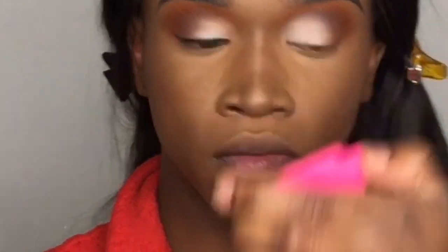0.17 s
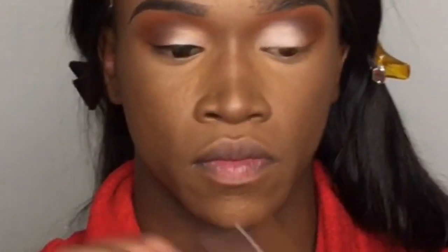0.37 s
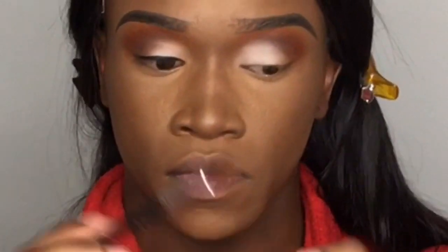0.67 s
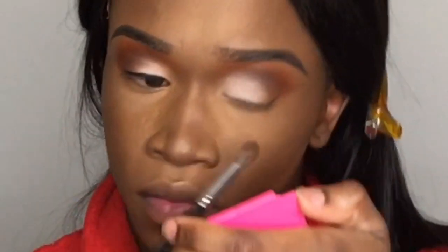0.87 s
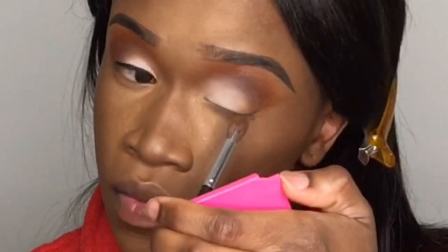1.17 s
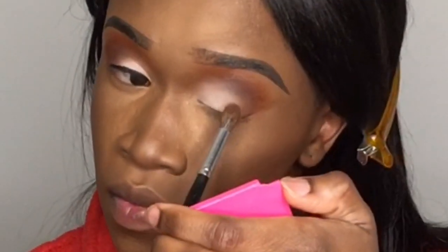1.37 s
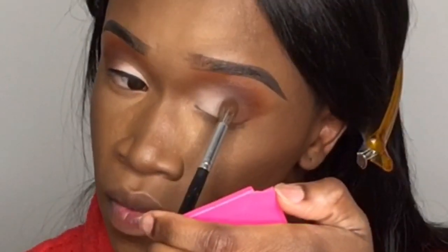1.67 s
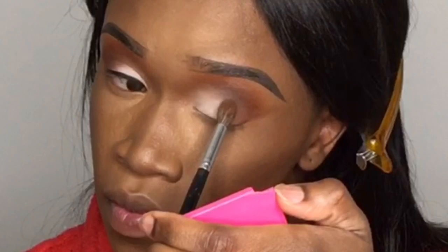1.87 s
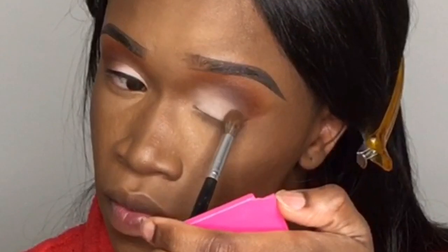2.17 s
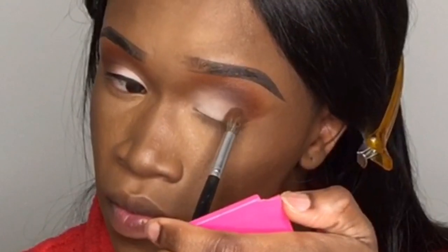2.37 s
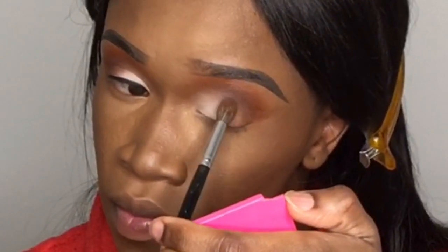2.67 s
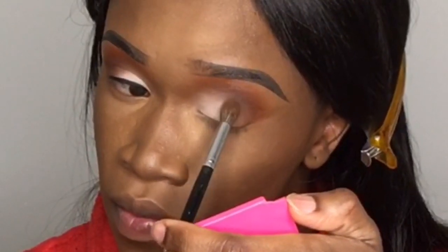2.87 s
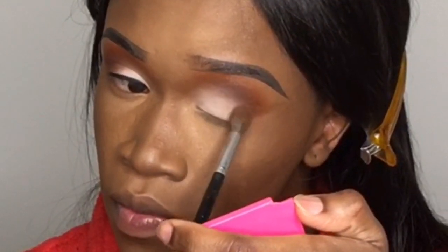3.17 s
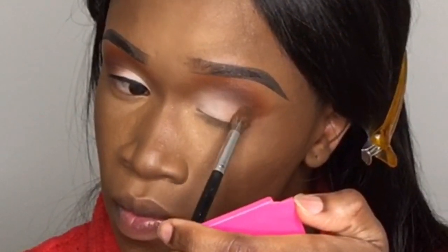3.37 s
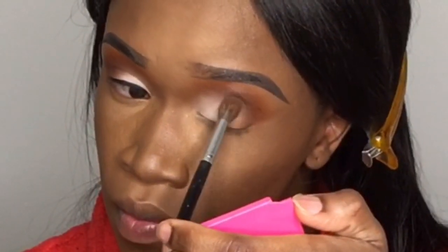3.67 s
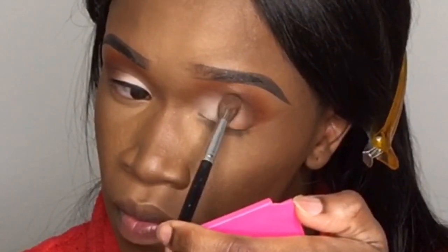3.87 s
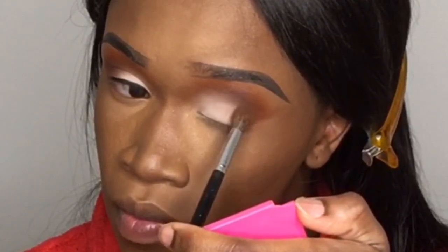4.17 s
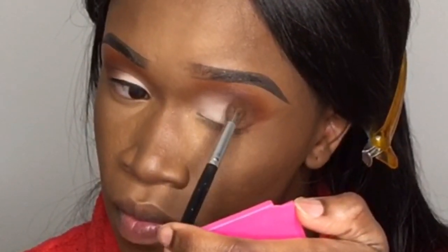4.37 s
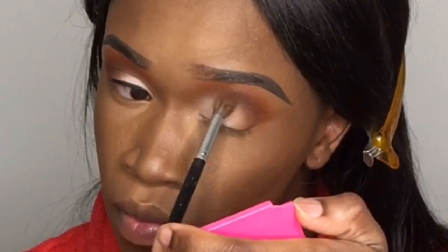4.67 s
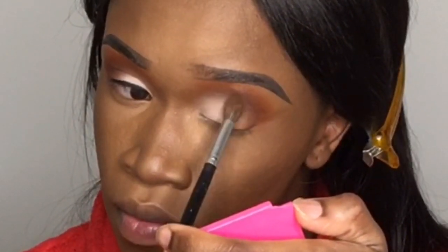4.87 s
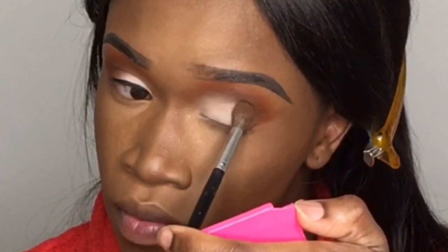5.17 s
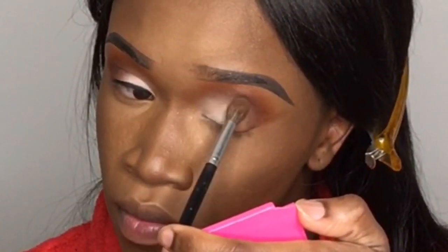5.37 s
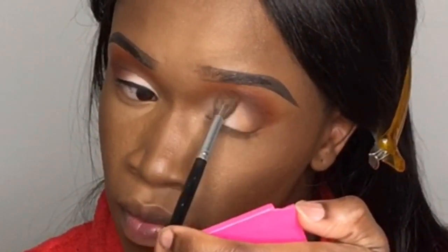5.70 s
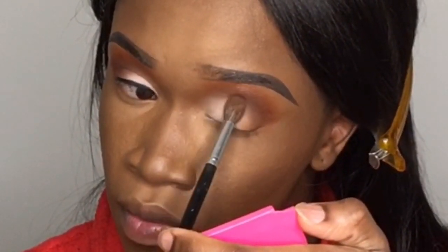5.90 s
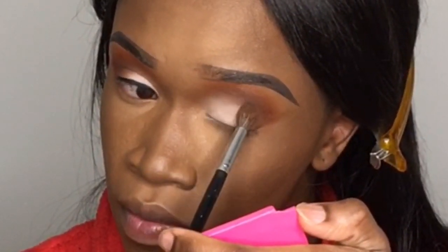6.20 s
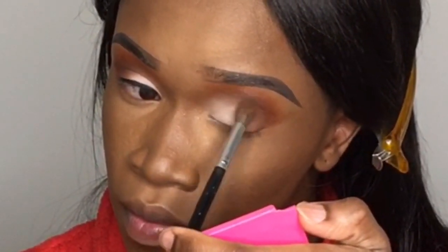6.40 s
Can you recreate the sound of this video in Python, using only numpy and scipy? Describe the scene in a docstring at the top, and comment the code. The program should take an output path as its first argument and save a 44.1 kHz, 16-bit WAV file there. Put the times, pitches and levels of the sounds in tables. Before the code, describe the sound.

Two quick, sharp snaps of a plastic makeup case sound right by the microphone, far louder than anything else, and ring briefly in a small room. Six faint, muffled thuds follow, about a second apart, each with a slight rustle. Throughout lies a quiet bed of ventilation rumble, fan hum, faint wavering drones and electronic hiss with very fine, fast ticking.

```python
"""A small, quiet room: from the start the ventilation rumbles and a fan hums under faint drones, while
the electronics add hiss and twenty tiny ticks a second. Near half a second, hard plastic snaps twice
close to the microphone, overloads it briefly and sets the room ringing. The low drone swells with the
snaps and again near two seconds; the high one sinks and fades. From one and a half seconds on, a soft,
dull thud returns about once a second."""
import sys
import numpy as np
from scipy import signal
from scipy.fft import rfft, irfft, next_fast_len
from scipy.io import wavfile

SR = 44100
rng = np.random.default_rng(int(sys.argv[2]) if len(sys.argv) > 2 else 0)


def unload_audio(sound):
    """Save the sound as a 16-bit wav file, at the path given as the first command line argument."""
    columns = np.transpose(np.atleast_2d(sound))
    # keep every value between -1 and 1, then stretch to whole-number steps
    steps = np.round(np.clip(columns, -1, 1) * 32767)
    wavfile.write(sys.argv[1], SR, steps.astype(np.int16))


N = 288414
TIME = np.arange(N) / SR


def from_db(db):
    """Amplitude grows tenfold for every 20 dB."""
    return 10 ** (np.asarray(db) / 20)


def at_hz(points, hz):
    """Interpolation on a logarithmic frequency axis gives each octave equal width."""
    frequencies, values = np.transpose(points)
    return np.interp(np.log(np.maximum(hz, 1)), np.log(frequencies), values)


def noise(spectrum):
    """Spectral shaping turns white noise into coloured noise, here scaled to rms 1."""
    size = next_fast_len(N)
    gain = from_db(at_hz(spectrum, np.fft.rfftfreq(size, 1 / SR)))
    coloured = irfft(rfft(rng.standard_normal(N), size) * gain, size)[:N]
    return coloured / np.sqrt(np.mean(coloured ** 2) + 1e-20)


def drift(rate_hz):
    """Interpolation between Gaussian values gives a slow fluctuation with a spread near 1."""
    return np.interp(TIME * rate_hz, np.arange(400), rng.standard_normal(400))


def decay(start_s, t60_s, rise_s):
    """Exponential damping: after its rise, the envelope loses 60 dB every t60_s."""
    age = np.maximum(TIME - start_s, 0)
    return (1 - np.exp(-age / rise_s)) * from_db(np.maximum(-60 * age / t60_s, -300))


def struck(start_s, modes, rise_s, spread_db):
    """Modal superposition: an impulse excites damped sinusoids, each of slightly random strength."""
    out = np.zeros(N)
    for k, (hz, db, t60_s) in enumerate(modes):
        strength = (-1) ** k * from_db(db + spread_db * rng.standard_normal())
        out += strength * decay(start_s, t60_s, rise_s) * np.sin(2 * np.pi * hz * (TIME - start_s))
    return out


def tone(hz, db, waver_hz, waver_db):
    """Random frequency and amplitude modulation make a sinusoid waver."""
    phase = 2 * np.pi * np.cumsum(hz + waver_hz * drift(14)) / SR
    return np.sqrt(2) * from_db(db + waver_db * drift(12)) * np.sin(phase)


def ventilation(rest_db=-47, extra_db=6, settle_s=1.96):
    """Random pressure fluctuations: the room's air booms, and a rumble settles to a steady level."""
    # Spectrum of the air's deep boom. Each row: frequency in Hz, relative density in dB.
    boom_spectrum = [(22, -34), (40, -12), (51, -11.5), (62, 1.5), (72, -5), (82, -1.5), (96, -10),
                     (140, -24), (400, -61)]
    # Course of the boom. Each row: time in seconds, level in dB.
    boom_levels = [(0, -46.5), (0.8, -44), (3.6, -43.5), (3.9, -48), (6.54, -45)]
    # Spectrum of the rumble. Each row: frequency in Hz, relative density in dB.
    rumble_spectrum = [(50, -24), (95, -9), (130, -3.5), (200, -11), (270, -15.5), (325, -13.5),
                       (480, -23.5), (750, -28.5), (2000, -47)]
    boom_db = np.interp(TIME, *np.transpose(boom_levels))
    rumble_db = rest_db + extra_db * np.exp(-TIME / settle_s)
    return from_db(boom_db) * noise(boom_spectrum) + from_db(rumble_db) * noise(rumble_spectrum)


def fan_hum(hz=61.8, rms_db=-56.5):
    """The periodic motion of a fan radiates a steady tone."""
    return np.sqrt(2) * from_db(rms_db) * np.sin(2 * np.pi * hz * TIME)


def low_drone(hz=146, rest_db=-56):
    """Slow amplitude modulation: a faint tone swells twice about a fixed mean pitch."""
    # Gaussian swells. Each row: crest time in seconds, level in dB, 1/e half-width in seconds.
    crests = [(0.4, -45.5, 0.43), (1.94, -41, 0.56)]
    swells = sum(from_db(db) * np.exp(-((TIME - s) / width) ** 2) for s, db, width in crests)
    return (from_db(rest_db) + swells) * tone(hz, db=0, waver_hz=1.2, waver_db=1.4)


def high_drone(first_hz=202.5, sunk_hz=189, hold_s=0.48, sink_s=0.36):
    """Exponential relaxation: a tone holds, sinks and fades; a hum lingers near its first pitch."""
    fade_db_per_s, hum_fade_db_per_s = 8.5, 3
    age = np.maximum(TIME - hold_s, 0)
    hz = sunk_hz + (first_hz - sunk_hz) * np.exp(-age / sink_s)
    sinking = tone(hz, db=-43 - fade_db_per_s * age, waver_hz=4.34, waver_db=3.5)
    hum = tone(hz=204.7, db=-47 - hum_fade_db_per_s * TIME, waver_hz=3.53, waver_db=2.5)
    return sinking + hum


def hiss(rms_db=-51):
    """Electronic noise spreads over a broad band, weaker towards the treble."""
    # Spectrum of the hiss. Each row: frequency in Hz, relative density in dB.
    spectrum = [(100, 1), (800, 0), (1500, -2.5), (2800, -5.5), (4000, -6.5), (4900, -10.5), (5600, -8),
                (6800, -10), (7800, -11), (9600, -9.5), (10400, -17.5), (11100, -12), (15500, -16.5)]
    return from_db(rms_db) * noise(spectrum)


def interference_ticks(first_s=0.0229, period_s=0.05, gain_db=-35, stray_share=0.18, uneven_db=0.5):
    """Convolution: regular pulses of interference, and a few strays, share one impulse response."""
    # Resonances of a tick. Each row: frequency in Hz, relative level in dB, 60 dB decay in seconds.
    modes = [(5940, -7, 0.0037), (6720, 2, 0.0029), (9690, -5, 0.0064), (12300, -6.5, .002),
             (14700, -6, .002)]
    beats = np.arange(first_s, TIME[-1], period_s)
    lag_draw, stray_draw, jitter_draw = rng.random((len(beats), 3)).T
    stray_lag_s = np.where(lag_draw < .5, .0035, .017)
    strays = (beats + stray_lag_s)[stray_draw < stray_share]
    onsets = (np.concatenate([beats + .0008 * jitter_draw, strays]) * SR).astype(int)
    pulses = np.zeros(N)
    pulses[onsets[onsets < N]] = 1
    pulses *= from_db(uneven_db * rng.standard_normal(N))
    response = struck(0, modes, rise_s=0.00052, spread_db=0.5)
    return from_db(gain_db) * signal.fftconvolve(pulses, response)[:N]


def crack(start_s, t60_s, low_hz, high_hz):
    """A brief transient has a broad spectrum: a few milliseconds of bright noise."""
    band = signal.butter(1, [low_hz, high_hz], "band", fs=SR, output="sos")
    return signal.sosfilt(band, rng.standard_normal(N)) * decay(start_s, t60_s, rise_s=.0001)


def plastic_snaps():
    """Impulsive excitation: the plastic cracks and rings; a near wall and the whole room reflect it."""
    # The snaps. Each row: start in seconds, gains in dB of the direct sound, the reverberation and
    # the lingering tones, delay of the wall's echo in seconds, its gain in dB.
    snaps = [(0.4275, 0, -10, -11.5, 0.0084, -1), (0.5644, 2, -12, -15, 0.0069, -7.5)]
    # The plastic's clack. Each row: frequency in Hz, relative level in dB, 60 dB decay in seconds.
    plastic_modes = [(423, -30, 0.061), (1132, -12, 0.022), (1725, -6, 0.013), (2954, -0.5, 0.013),
                     (3590, -5, 0.015), (4350, -3.5, 0.015), (6530, -10.5, 0.016), (8980, -4, 0.0065),
                     (13240, -11, 0.0081)]
    # Lingering tones. Each row: frequency in Hz, relative level in dB, 60 dB decay in seconds.
    ring_modes = [(1144, -17.5, 0.38), (1580, -14, 0.22), (1870, 1.5, 0.11), (2020, -2, 0.17),
                  (2129, 1.5, 0.19), (2282, -7.5, 0.35), (2570, -15.5, 0.32), (2850, 2.5, 0.1),
                  (3137, -6, 0.21), (3569, -13.5, 0.24), (3660, -2, 0.15), (4160, -17.5, 0.24),
                  (4070, -13, .35), (4400, -9, 0.27), (4940, -9, 0.18), (5530, -13, 0.22), (6170, -22, 0.3)]
    out = np.zeros(N)
    for start_s, direct_db, room_db, ring_db, delay_s, echo_db in snaps:
        clack = struck(start_s, plastic_modes, rise_s=.0001, spread_db=4.0)
        burst = from_db(-8.0) * crack(start_s, t60_s=0.006, low_hz=1500, high_hz=12000)
        out += from_db(direct_db) * (clack + burst)
        out += from_db(echo_db) * crack(start_s + delay_s, t60_s=0.013, low_hz=1187, high_hz=10940)
        out += from_db(room_db) * reverberation(start_s, rise_s=0.0027)
        # the lingering tones build up along with the reflections
        out += from_db(ring_db) * struck(start_s, ring_modes, rise_s=0.0096, spread_db=2.0)
    return out


def reverberation(start_s, rise_s):
    """A diffuse field: dense reflections build up and die away, faster in the treble."""
    # Spectrum of the reflections. Each row: frequency in Hz, relative density in dB.
    spectrum = [(150, -32), (300, -24), (550, -26.5), (690, -14.5), (810, -24.5), (1120, -13),
                (1600, -14.5), (2150, -3), (2600, -8.5), (3800, -12.5), (6600, -13), (7600, -17),
                (10000, -18), (15500, -26)]
    # The room's decay. Each row: band centre in Hz, reverberation time in seconds.
    band_decays = [(300, 0.32), (1100, 0.29), (2300, 0.32), (6000, 0.31), (10000, 0.23), (15000, 0.17)]
    centres, t60s = np.transpose(band_decays)
    size = next_fast_len(N)
    field, hz = rfft(noise(spectrum), size), np.fft.rfftfreq(size, 1 / SR)
    out = np.zeros(N)
    for one_band, t60_s in zip(np.eye(len(centres)), t60s):
        share = at_hz(np.column_stack([centres, one_band]), hz)
        out += irfft(field * share, size)[:N] * decay(start_s, t60_s, rise_s)
    return out


def dull_thuds(half_width_s=0.033, rustle_db=-41.5):
    """Low noise under a smooth envelope is heard as a soft thud; a faint rustle outlasts each one."""
    # The thuds. Each row: crest time in seconds, level in dB.
    crests = [(1.491, -37), (2.41, -41), (3.43, -39), (4.41, -37.5), (5.435, -35), (6.46, -41.5)]
    # Spectra of a thud's body and its rustle. Each row: frequency in Hz, relative density in dB.
    body_spectrum = [(60, -27), (110, -3.5), (140, 4.5), (175, -4.5), (260, -18.5), (600, -39), (2000, -67)]
    rustle_spectrum = [(150, 2), (300, 3), (540, -8), (660, 8), (800, -18), (1200, -13), (2000, -10),
                       (3500, -31), (12000, -50)]
    bumps = sum(from_db(db) * np.exp(-((TIME - s) / half_width_s) ** 2) for s, db in crests)
    tails = sum(decay(s - half_width_s, t60_s=0.53, rise_s=0.041) for s, _ in crests)
    return bumps * noise(body_spectrum) + from_db(rustle_db) * tails * noise(rustle_spectrum)


def scene():
    """Superposition: the room's sounds add at one microphone, and the electronics add their own."""
    room = plastic_snaps() + ventilation() + fan_hum() + low_drone() + high_drone() + dull_thuds()
    return (room + interference_ticks() + hiss())[None]


def record(dry, cutoff_hz=15800):
    """Overload and band limiting: the input clips at full scale, then a low-pass cuts the top."""
    low_pass = signal.ellip(10, .1, 70, cutoff_hz, fs=SR, output="sos")
    return signal.sosfilt(low_pass, np.clip(dry, -1, 1))


dry = scene()
out = record(dry)
unload_audio(out)
```